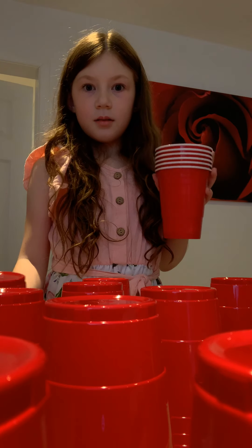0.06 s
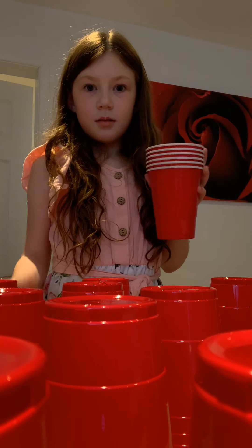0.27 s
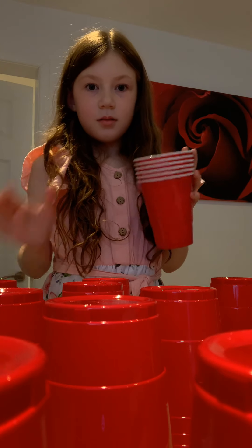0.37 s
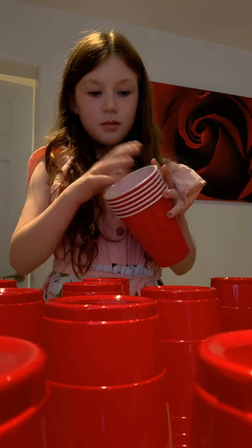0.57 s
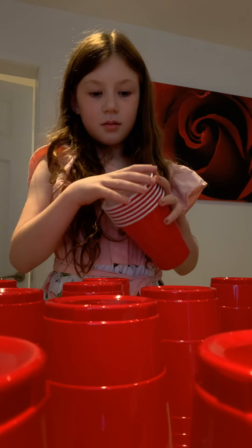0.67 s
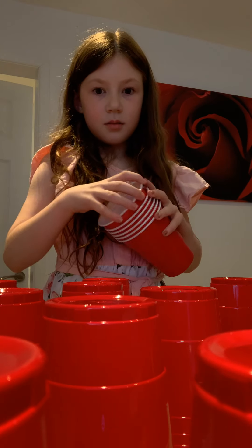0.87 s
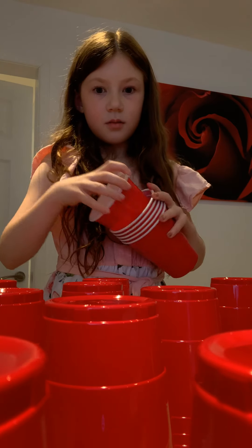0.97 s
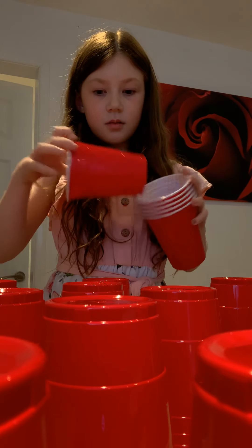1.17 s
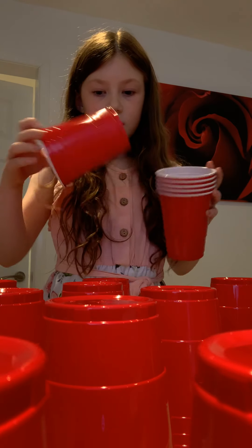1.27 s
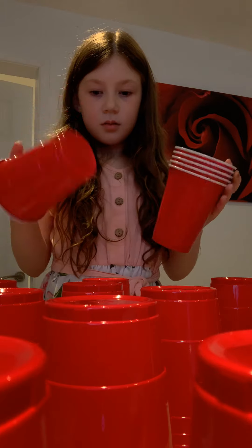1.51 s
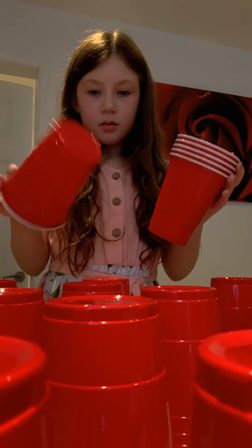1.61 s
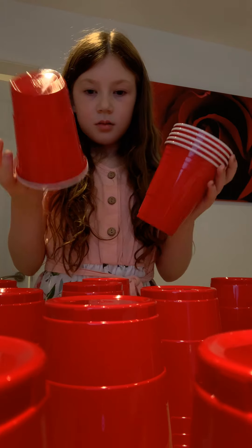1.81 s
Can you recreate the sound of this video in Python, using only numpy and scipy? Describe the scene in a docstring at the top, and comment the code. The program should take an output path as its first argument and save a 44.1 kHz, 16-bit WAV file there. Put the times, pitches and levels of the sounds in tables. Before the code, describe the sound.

A thin plastic cup scrapes briefly and lands on a table with a hollow knock close to the microphone. A little farther off, another cup slides from a stack with soft rubbing and rim clicks in a small room.

```python
"""Plastic cups on a table

A small live room, one microphone close to the table. A thin plastic cup is nudged along and set down
with a hollow knock. A little farther off, fingers slide the next cup from a nested stack: its wall
rubs, its rim ticks on the others, and it clicks, scuffs and rings softly as it turns in the hand."""
import sys
import numpy as np
from scipy import signal
from scipy.fft import rfft, irfft, next_fast_len
from scipy.io import wavfile
from scipy.ndimage import uniform_filter1d, minimum_filter1d

SR = 44100
rng = np.random.default_rng(int(sys.argv[2]) if len(sys.argv) > 2 else 0)


def transcribe(signal):
    """Save signal, clipped to [-1, 1], as a 16-bit WAV file at the path in sys.argv[1]."""
    frames = np.atleast_2d(signal).T
    limited = np.clip(frames, -1, 1)
    pcm = np.round(limited * 32767).astype(np.int16)
    wavfile.write(sys.argv[1], SR, pcm)


N = 81585
KNOCK_S = 0.2252  # the cup lands


def amp(db):
    """Decibels to gain."""
    return 10 ** (np.asarray(db) / 20)


def unit(x):
    """Scale to rms 1."""
    return x / np.sqrt(np.mean(x ** 2) + 1e-20)


def along(points, hz):
    """Interpolate (Hz, value) points on a log frequency axis."""
    freqs, values = np.transpose(points)
    return np.interp(np.log(hz + 1), np.log(freqs + 1), values)


def since(s):
    """Seconds since s, zero before."""
    return np.maximum(np.arange(N) / SR - s, 0)


def curves(rows):
    """One value per sample for each column after the time."""
    times, *columns = np.transpose(rows)
    return [np.interp(since(0), times, column) for column in columns]


def filtered(x, response):
    """Filter x by a gain given as a function of frequency."""
    size = next_fast_len(N + SR // 4)
    return irfft(rfft(x, size) * response(np.fft.rfftfreq(size, 1 / SR)), size)[:N]


def coloured(x, colour):
    """x with a (Hz, dB) colour, at rms 1."""
    return unit(filtered(x, lambda hz: amp(along(colour, hz))))


def noise(colour):
    """Coloured noise of rms 1."""
    return coloured(rng.standard_normal(N), colour)


def low_cut(x, hz):
    """Second-order high-pass."""
    return signal.sosfilt(signal.butter(2, hz, "highpass", fs=SR, output="sos"), x)


def strike(s, attack, t60, hold=0):
    """Envelope from time s: rise, hold, exponential fall, all in seconds."""
    t = since(s)
    return np.minimum(t / attack, 1) * amp(-60 * np.maximum(t - attack - hold, 0) / t60)


def tone(s, hz):
    """A sine that starts at s."""
    return np.sin(2 * np.pi * hz * since(s))


def slips(colour, per_s=2500, spread_db=0.5):
    """Friction: dense tiny slips of uneven size."""
    hits = rng.random(N) < per_s / SR
    sizes = rng.standard_normal(N) * amp(spread_db * rng.standard_normal(N))
    return coloured(hits * sizes, colour)


# The small room's decay: (frequency [Hz], t60 [s])
ROOM_DECAY = [(150, 0.55), (400, 0.45), (1000, 0.28), (2800, 0.36), (7300, 0.26), (14000, 0.34)]


def room(x, wet_db, delay=0, build_s=0.004):
    """Direct sound plus a diffuse tail that builds after a delay and dies at each frequency's own rate."""
    hz, t, spectrum = signal.stft(rng.standard_normal(SR), SR, nperseg=256)
    decay = amp(-60 * t / along(ROOM_DECAY, hz)[:, None])
    tail = signal.istft(spectrum * decay, SR, nperseg=256)[1]
    tail *= 1 - np.exp(-since(delay)[:len(tail)] / build_s)
    return x + amp(wet_db) * signal.fftconvolve(x, tail / np.linalg.norm(tail))[:N]


# Still air at the microphone: (frequency [Hz], level [dB])
AIR_COLOUR = [(25, -23), (60, 3.5), (120, -5), (270, -3.5), (460, -11), (700, -19.5), (1000, -22.5),
              (1400, -24.5), (2000, -28.5), (2900, -23), (4400, -30), (6300, -37), (8000, -34), (9000, -47),
              (16000, -58)]


def room_tone():
    """Quiet room air with a faint hum."""
    return amp(-58.5) * noise(AIR_COLOUR) + amp(-62) * tone(0, hz=121.7)


# The rim scraping the table: (time [s], level [dB])
DRAG_LEVELS = [(0, -36), (.02, -46.5), (.045, -51.5), (.06, -46.5), (.086, -53.5), (.091, -41), (.125, -56),
               (.178, -52), (.186, -46), (.215, -47), (.23, -47), (.3, -100)]
# Its spectrum: (frequency [Hz], level [dB])
SCRAPE_COLOUR = [(80, -8), (230, -17.5), (340, 3.5), (450, -4), (600, 0), (800, -9.5), (1100, -10),
                 (1550, -28.5), (2100, -7.5), (2450, -21.5), (2900, -16.5), (5500, -21), (8000, -29),
                 (9000, -42.5), (16000, -54)]


def cup_drag(groan_start_hz=652.4, fall_hz_per_s=700, hum_hz=337):
    """Close by, the rim scrapes with a falling groan; the cup's air hums, swelling before the knock."""
    level_db, = curves(DRAG_LEVELS)
    groan_hz = groan_start_hz - fall_hz_per_s * np.minimum(since(0), KNOCK_S)
    flutter = noise([(10, 5.5), (30, -1), (120, -36), (400, -75)])
    groan = flutter * np.sin(2 * np.pi * np.cumsum(groan_hz) / SR)
    scrape = amp(level_db) * (slips(SCRAPE_COLOUR) + amp(-1) * groan)
    swell_db = 13 * np.minimum(since(KNOCK_S - 0.04) / 0.025, 1)
    waver_db = 2 * noise([(10, 3), (25, 6), (60, -81)])
    hum = amp(-46.5 + swell_db + waver_db) * tone(0, hum_hz)
    return room(scrape, wet_db=-4) + hum * strike(0, attack=0.0018, t60=0.023, hold=KNOCK_S)


# Modes the knock sets ringing: two low room resonances, then the cup's air and walls:
# (frequency [Hz], boom level [dB], boom t60 [s], ring level [dB], ring t60 before settling [s])
KNOCK_MODES = [(143.2, -50, .04, -37.5, 0.68), (202, -20.5, 0.05, -41.5, 0.81),
               (273, -29, 0.016, -32, 0.15), (311.7, -11, 0.047, -22, 0.26),
               (338.7, -13, 0.026, -15.5, 0.46), (363, -12.5, 0.04, -22.5, 0.26),
               (372, -25, 0.022, -40, 0.23), (494, -23.5, 0.09, -26.5, 0.41),
               (924, -11.5, 0.042, -25.5, 0.3), (1237, -24, 0.067, -34.5, 0.38),
               (1783, -35, 0.055, -52, 0.23), (2008, -27, 0.081, -38.5, 0.21),
               (2064, -24.5, 0.061, -44, 0.17), (2240, -35, .05, -47, 0.38), (2360, -37.5, .05, -58, 0.26),
               (2674, -33, 0.039, -43, 0.16), (2886, -33.5, .04, -44, 0.51), (3250, -49, .04, -44, 0.4),
               (3960, -31.5, 0.063, -61, 0.26)]
# The rim catches on the table, hits it, then settles: (time [s], level [dB])
RIM_CONTACTS = [(0.091, -49), (0.185, -54), (0.2243, -16.5), (0.235, -25), (0.261, -26), (0.299, -37.5),
                (0.329, -26), (.372, -54)]
# Their spectrum: (frequency [Hz], level [dB])
CRACK_COLOUR = [(60, -32), (110, -34), (170, -7), (350, 10), (600, 10.5), (800, -10), (1100, 0),
                (1550, -9.5), (2100, -5), (4000, -9.5), (4800, -17.5), (6500, -12.5), (8000, -8.5),
                (9000, -28.5), (16000, -39.5)]


def cup_knock(settle_s=0.41, settle_db_per_s=85):
    """The upturned cup lands close by: its rim cracks; its air, its walls and the room boom and ring."""
    boom = sum(amp(db) * tone(KNOCK_S, hz) * strike(KNOCK_S, attack=0.002, t60=t60, hold=0.0025)
               for hz, db, t60, _, _ in KNOCK_MODES)
    ring = sum(amp(db) * tone(KNOCK_S, hz) * strike(KNOCK_S, attack=0.019, t60=t60)
               for hz, _, _, db, t60 in KNOCK_MODES)
    contacts = sum(amp(db) * strike(s, attack=0.00046, t60=0.031) for s, db in RIM_CONTACTS)
    crack = noise(CRACK_COLOUR) * contacts
    damping = amp(-settle_db_per_s * since(settle_s))  # the ring dies faster once the cup sits flat
    resonance = damping * (room(boom, wet_db=-6.5, delay=0.0292) + ring)
    return low_cut(resonance + room(crack, wet_db=2.5), hz=130)  # so small a cup radiates little bass


# Plastic rubbing on plastic and skin: (time [s], hiss level [dB], body level [dB], fizz boost [dB])
RUB_LEVELS = [(.52, -88, -63, 5), (.57, -69, -63, 8), (.72, -73.5, -72, -3), (.86, -63, -67, 5),
              (.895, -53, -52, 5.5), (.98, -54, -52, 2), (1.045, -51.5, -56.5, 4), (1.09, -61.5, -57, -1),
              (1.15, -68, -67.5, -15), (1.34, -81.5, -68, 4), (1.39, -61.5, -62.5, -2),
              (1.49, -62, -60.5, 3), (1.555, -62.5, -60, -14), (1.588, -43, -57, -12), (1.625, -59, -66, 0),
              (1.72, -61, -58, -10), (1.79, -67, -80, -9), (1.85, -107, -84, -11)]
# The rubbed wall's resonances: (frequency [Hz], half-width [Hz], boost [dB])
WALL_MODES = [(2198, 51, 9.5), (2305, 60, 8), (2820, 20, 10), (3050, 31, -7), (4044, 31, 9), (4960, 60, 1),
              (5080, 240, 2), (7160, 220, 1.5), (7440, 60, 10.5)]
# Spectra of the friction and of the cup's body: (frequency [Hz], level [dB])
FRICTION_COLOUR = [(300, -19), (1200, -27), (1600, -4.5), (2300, -5.5), (3000, 4.5), (4400, -0.5),
                   (5400, 2), (8000, -5.5), (9000, -8), (16000, -18)]
CUP_BODY_COLOUR = [(60, -19), (150, -4.5), (290, 4.5), (560, 2), (730, 6), (1000, -5.5), (1400, -13),
                   (4000, -34)]


def wall_rub(fizz_hz=9000):
    """Sliding off the stack and through the fingers rings the wall; plastic on plastic fizzes most."""
    def wall(hz):
        return amp(sum(db / (1 + ((hz - centre) / width) ** 2) for centre, width, db in WALL_MODES))

    hiss_db, body_db, fizz_db = curves(RUB_LEVELS)
    hiss = unit(filtered(slips(FRICTION_COLOUR), wall))
    fizz = filtered(hiss, lambda hz: 1 / (1 + (fizz_hz / (hz + 1)) ** 8))
    return amp(hiss_db) * (hiss + (amp(fizz_db) - 1) * fizz) + amp(body_db) * slips(CUP_BODY_COLOUR)


# Rims ticking in the hands; ping, body and send are relative to the level: (time [s], level [dB],
# ping pitch [Hz], ping [dB], body [dB], snap t60 [s], treble tilt [dB/octave], room send [dB])
RIM_TICKS = [(0.5447, -50, 3180, -6, -5.5, 0.076, 6, -5), (.627, -53.5, 2830, -8, -12, 0.033, 3, -1),
             (0.6578, -55.5, 2900, -1, 4, 0.078, 1.5, -5), (0.791, -61.5, 2880, 5, -12, 0.063, 5, 0),
             (0.8767, -47.5, 5570, -4.5, 1.5, 0.012, 8, -24), (0.9238, -38, 5710, -8, -1.5, 0.022, -10, 0),
             (0.9769, -45, 7600, -30, 4.5, 0.05, 8, 3.5), (1.0161, -44, 2996, 1.5, 1, 0.077, -5, -6.5),
             (1.117, -42, 3030, 2.5, -9, 0.056, -6, -6), (1.2932, -58, 2850, -13, -9, 0.066, -5, -14),
             (1.352, -45.5, 2943, 0, -6, 0.043, -1, -3.5), (1.397, -47.5, 5000, -24, -5, 0.037, -2, -4),
             (1.4073, -45.5, 4900, -18, -25, .025, -2, -21),
             (1.454, -33.5, 2950, -35, -9.5, 0.017, 1.5, -0.5),
             (1.4602, -46.5, 6700, -15, -2, 0.032, 13, 0.5), (1.514, -42.5, 3480, -1, -12, 0.061, 1, -2.5),
             (1.523, -47, 2315, -3.5, -3, 0.038, 1, -1.5), (1.581, -39.5, 7850, 1, -24, 0.031, 11, -6),
             (1.593, -39, 5160, -5, -11.5, 0.039, -20, -1), (1.612, -42.5, 3580, -1.5, -11, 0.033, -9, -29),
             (1.6835, -69, 2850, -1, -17, .02, 7, -7), (1.698, -49.5, 2700, -13, 2.5, 0.032, -5, -10.5),
             (1.716, -55.5, 4070, 4, -14, 0.035, 2, 2), (1.765, -59.5, 2740, 3, -25, 0.07, 5, -14)]
# The snap's spectrum: (frequency [Hz], level [dB])
SNAP_COLOUR = [(200, -5.5), (1350, -8.5), (2300, 0.5), (3300, 3), (5000, 0.5), (8000, -3.5), (9000, -10.5),
               (16000, -20.5)]


def rim_ticks(band_db=3, band_share=0.15):
    """Each rim contact is a snap with a short ping of the plastic and a little of the cup's body."""
    hiss, body_noise = noise(SNAP_COLOUR), noise(CUP_BODY_COLOUR)
    direct, sent = np.zeros(N), np.zeros(N)
    for s, db, ping_hz, ping_db, body_db, t60, tilt_db, send_db in RIM_TICKS:
        def snap_response(hz):
            """The snap gathers around the ping's pitch and tilts above it."""
            band = 1 + amp(ping_db + band_db) / (1 + ((hz / ping_hz - 1) / band_share) ** 2)
            return band * amp(tilt_db * np.log2(1 + (hz / ping_hz) ** 2) / 2)

        snap = unit(filtered(hiss, snap_response)) * strike(s, attack=0.00047, t60=t60)
        ping = amp(ping_db) * tone(s, ping_hz) * strike(s, attack=0.0017, t60=0.043)
        body = amp(body_db) * body_noise * strike(s, attack=0.0028, t60=0.034)
        tick = amp(db) * (snap + ping + body)
        direct += tick
        sent += amp(send_db) * tick
    reflections = room(sent, wet_db=-3.5) - sent
    return direct + reflections


# Fingers and walls sounding the cup's hollow: (time [s], level [dB], pitch [Hz], attack [s], t60 [s])
HOLLOW_TAPS = [(.662, -54, 635, 0.0028, 0.17), (.878, -42, 755, 0.006, 0.065),
               (.905, -41.5, 761, 0.0052, 0.099), (.924, -38, 740, 0.0063, 0.087),
               (1.015, -43, 723, 0.0048, 0.042), (1.044, -45, 728, 0.0024, 0.043),
               (1.525, -37, 706, 0.012, 0.025), (1.583, -43, 702, 0.0057, 0.046),
               (1.711, -46.5, 711, 0.00099, 0.086), (1.791, -48, 710, 0.00033, 0.041)]


def hollow_taps(wall_hz=312.3):
    """Soft pushes sound the cup's flexing wall and its hollow, lower as it leaves the stack."""
    taps = np.zeros(N)
    for s, db, hz, attack, t60 in HOLLOW_TAPS:
        hollow = tone(s, hz) * strike(s, attack, t60, hold=0.0031)
        wall = amp(-10) * tone(s, wall_hz) * strike(s, attack, t60=0.23)
        taps += amp(db) * (hollow + wall)
    return taps


def limiter(x, limit_db=-7.5, release_db_per_s=23):
    """The gain drops at once on a loud peak and climbs back at a steady rate."""
    over_db = np.maximum(20 * np.log10(np.abs(x) + 1e-9) - limit_db, 0)
    climb_db = release_db_per_s * since(0)
    gain_db = climb_db - np.maximum.accumulate(over_db + climb_db)
    held_db = minimum_filter1d(gain_db, size=45)  # about 1 ms
    return x * amp(uniform_filter1d(held_db, size=45))


def scene():
    """The table cup is near the microphone, the hands a little farther off."""
    hands = rim_ticks() + room(wall_rub(), wet_db=-4) + room(hollow_taps(), wet_db=-5.5)
    table = cup_drag() + cup_knock()
    return (table + hands + room_tone())[None]


def record(dry):
    """The mono microphone thins the deep bass, a limiter ducks the knock, and the top treble is cut."""
    limited = limiter(low_cut(dry[0], hz=122))
    return filtered(limited, lambda hz: hz < 15900)[None]


dry = scene()
out = record(dry)
transcribe(out)
```